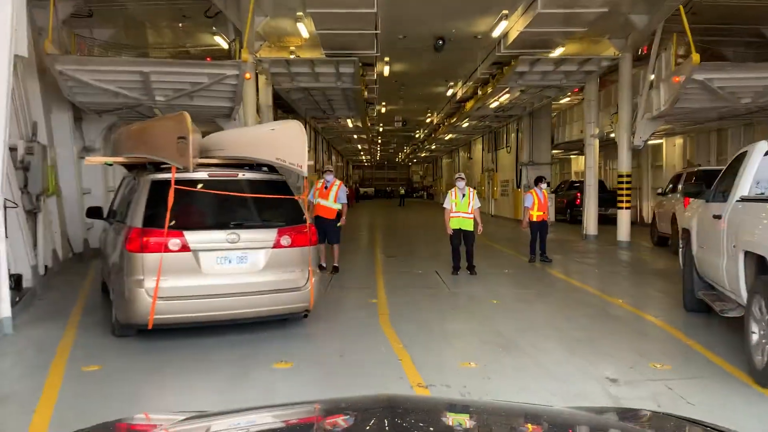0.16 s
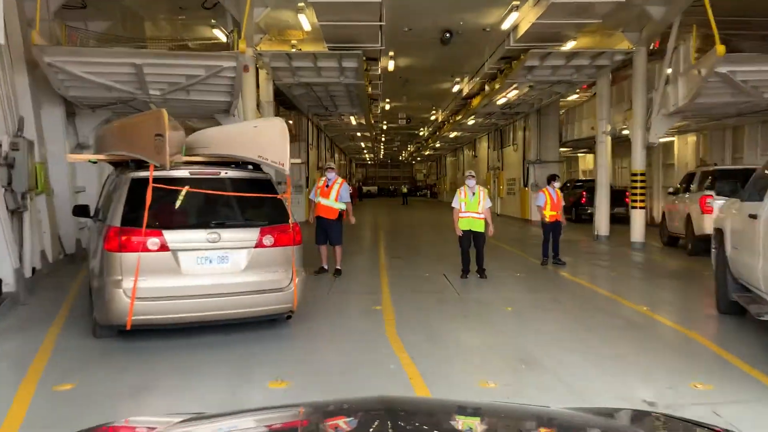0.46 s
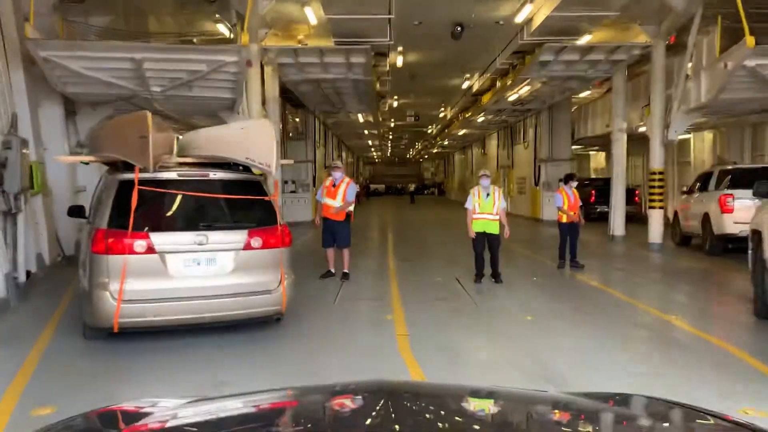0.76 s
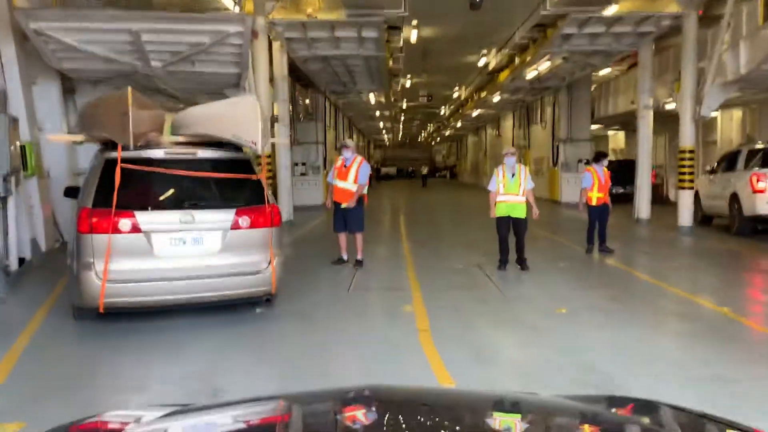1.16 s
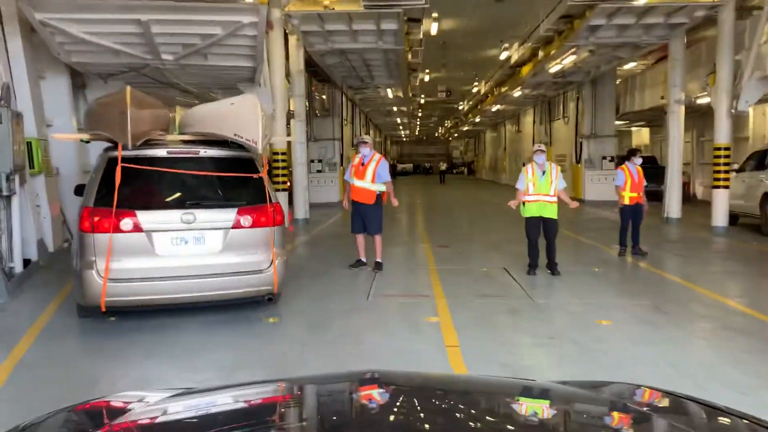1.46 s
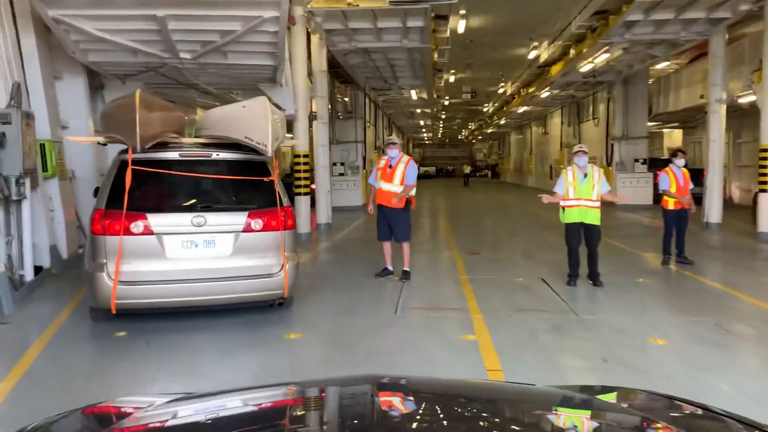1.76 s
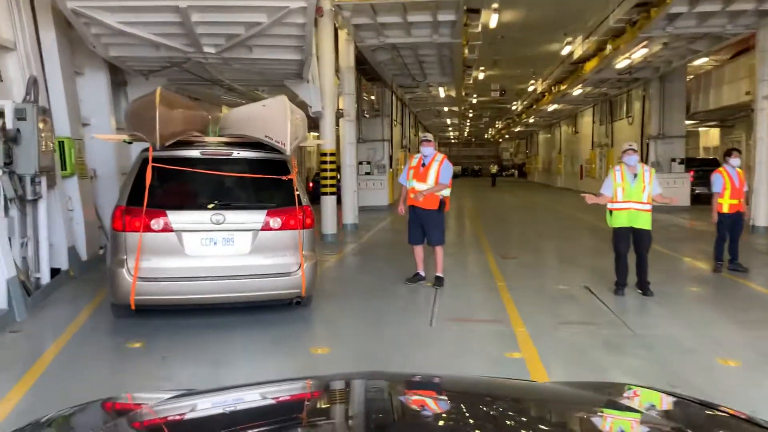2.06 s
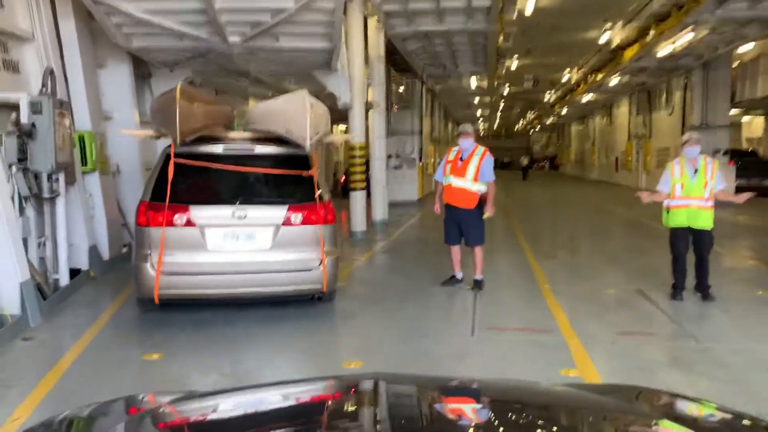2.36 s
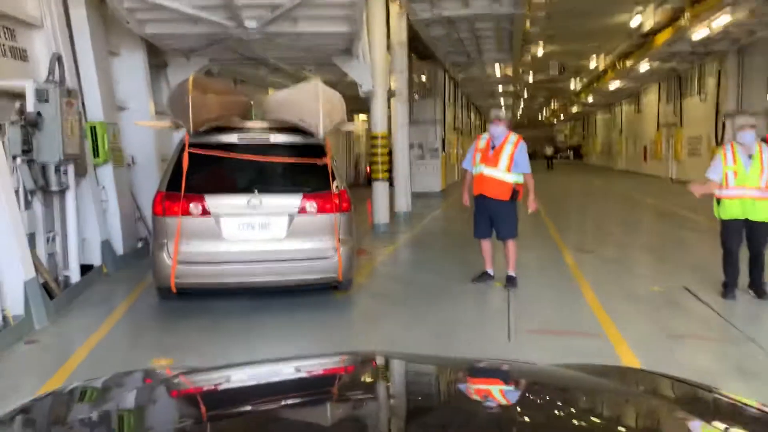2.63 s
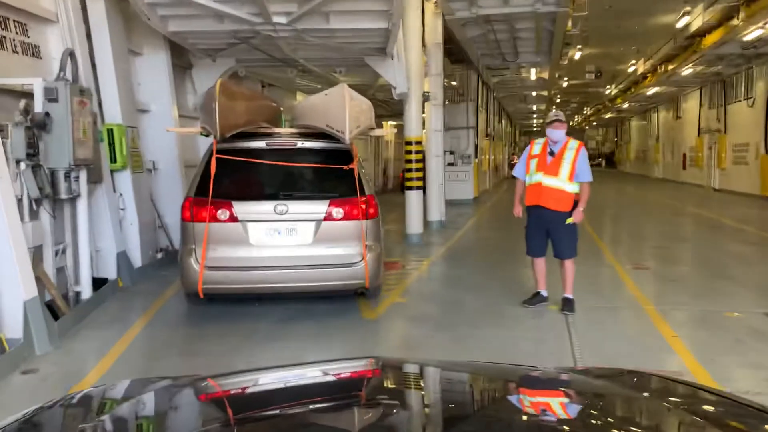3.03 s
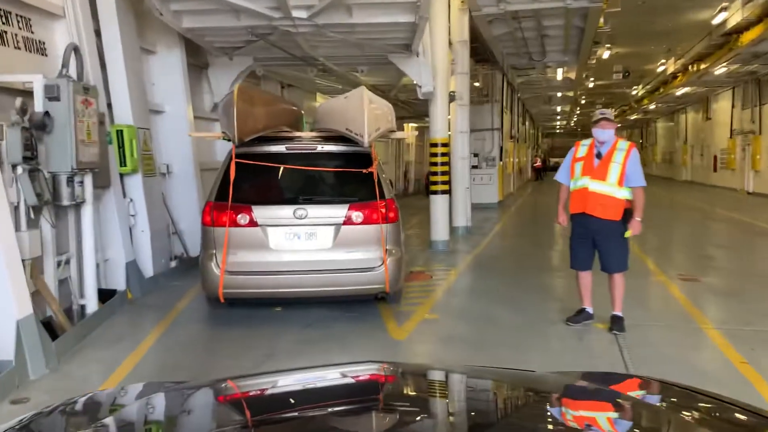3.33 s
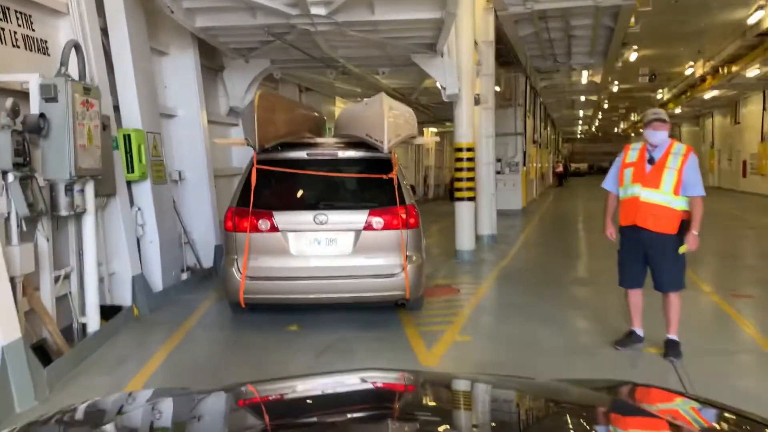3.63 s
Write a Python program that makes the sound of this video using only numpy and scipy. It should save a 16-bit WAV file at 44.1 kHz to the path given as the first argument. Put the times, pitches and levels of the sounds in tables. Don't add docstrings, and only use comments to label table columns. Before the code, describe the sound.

From a slowly rolling car, a phone picks up wavering fan hum, hull rumble and rushing air in a long steel hall, with brief plate thumps, one sharp air spit and three echoing puffs.

```python
import sys
import numpy as np
from scipy import signal
from scipy.fft import rfft, irfft, next_fast_len
from scipy.io import wavfile
from scipy.ndimage import uniform_filter1d, map_coordinates

SR = 44100
rng = np.random.default_rng(int(sys.argv[2]) if len(sys.argv) > 2 else 0)


def to_wav(s):
    ch = np.atleast_2d(s).T
    pcm = np.round(np.clip(ch, -1, 1) * 32767)
    wavfile.write(sys.argv[1], SR, pcm.astype(np.int16))


def ratio(d):
    e = np.asarray(d, float) / 20
    return 10 ** e


N = 167139
TIME = np.arange(N) / SR


def tone(hz, orders, level, apart):
    swell_db, apart_db = curve(level), curve(apart)
    usual_db = swell_db.mean()
    turn = 2 * np.pi * np.cumsum(hz + 0.45 * wobble(5)) / SR
    out = np.zeros((2, N))
    for multiple, db, share in orders:
        steady_db = usual_db + db
        mid_db = steady_db + share * (swell_db - usual_db) + 1.73 * wobble(5.67)
        mid = ratio(mid_db) * np.sin(multiple * turn + 0.68 * wobble(3.03))
        side_db = steady_db + np.minimum(apart_db + 4 * (multiple - 1), 2) + 0.5 * wobble(2.8)
        side = ratio(side_db) * np.cos(multiple * turn + wobble(2.72))
        out += np.sqrt(2) * np.array([mid + side, mid - side])
    return out


# (multiple of the blade tone, level over the blade tone [dB], share of its swell [0-1])
LOW_FAN_OVERTONES = [(1, 0.5, 0.88), (2, -38, 0.42), (3, -15, 0.27), (4, -35, 1), (5, -19, 0.8),
                     (6, -22, 0.57)]
HIGH_FAN_OVERTONES = [(1, 0.5, 1), (1.5, -8, 0.067)]
# (time [s], level [dB])
LOW_FAN_LEVEL = [(0.0, -27), (0.04, -20.5), (0.31, -16.5), (0.66, -17), (0.8, -19), (1.24, -26.5),
                 (1.41, -25.5), (1.77, -25), (1.9, -35), (2.16, -25.5), (2.51, -22.5), (2.62, -32),
                 (2.75, -29), (2.9, -34.5), (3.07, -21.5), (3.18, -29.5), (3.56, -22), (3.79, -25)]
HIGH_FAN_LEVEL = [(0.0, -23), (0.35, -17.5), (0.66, -28.5), (0.72, -16.5), (0.8, -27.5), (1.84, -22),
                  (1.92, -46), (2.16, -26.5), (2.51, -33), (2.59, -18), (2.73, -35), (2.83, -21.5),
                  (3.03, -40), (3.15, -20), (3.35, -19), (3.39, -29), (3.69, -18.5), (3.79, -29)]
# (time [s], level [dB])
TONE_662_LEVEL = [(0, -56), (.2, -33), (.33, -27.5), (.45, -39), (.6, -25), (.8, -34), (1.1, -36), (1.4, -41),
                  (1.75, -39), (1.95, -51), (2.4, -52), (2.73, -33.5), (2.95, -45), (3.07, -39), (3.3, -42),
                  (3.79, -48)]
# (time [s], level [dB])
LOW_FAN_SIDE = [(0, -23), (.5, -14), (.8, -24), (1.1, -5), (1.501, -17), (2.402, -15), (2.9, -10),
                (3.3, -18), (3.79, -14)]
HIGH_FAN_SIDE = [(0, -11), (1.5, -8), (2.5, -11.5), (3.79, -7)]
TONE_662_SIDE = [(0, -4), (3.79, -2)]
# (multiple, level over the tone [dB], share of its swell [0-1])
ALONE = [(1, 0, 1)]


def fans():
    low_fan = tone(164.44, LOW_FAN_OVERTONES, LOW_FAN_LEVEL, LOW_FAN_SIDE)
    high_fan = tone(254.2, HIGH_FAN_OVERTONES, HIGH_FAN_LEVEL, HIGH_FAN_SIDE)
    tone_662 = tone(662, ALONE, TONE_662_LEVEL, TONE_662_SIDE)
    return low_fan + high_fan + tone_662


# (time [s], firing rate [Hz], level [dB])
ENGINE = [(0.0, 63, -33), (0.18, 60, -56), (0.32, 65.3, -18), (0.5, 67.76, -52), (0.76, 60.7, -26.5),
          (0.99, 58.9, -26), (1.1, 69.2, -21.5), (1.26, 70, -20.5), (1.29, 69.2, -46), (1.95, 68.45, -21),
          (2.21, 64.8, -31), (2.4, 67.1, -43), (2.59, 66.1, -19.5), (2.79, 68.3, -29), (2.99, 58.6, -25),
          (3.43, 62.3, -31), (3.49, 67.5, -50), (3.79, 68.3, -28)]
# (time [s], level [dB])
IDLER_LEVEL = [(0.0, -31.5), (0.56, -23.5), (0.85, -34), (1.4, -24.5), (1.83, -37.5), (2.23, -27.5),
               (2.76, -41), (2.93, -50), (3.01, -27), (3.161, -54), (3.51, -34), (3.79, -36)]
# (time [s], level [dB])
PUMP_LEVEL = [(0.0, -33.5), (0.62, -24.5), (0.72, -39), (0.81, -28), (1.45, -25.5), (1.51, -37),
              (3.36, -33), (3.44, -42), (3.6, -24), (3.79, -36)]


def engines():
    low_side = [(0, -27)]
    time, rate_hz, db = np.transpose(ENGINE)
    engine = tone(curve(np.c_[time, rate_hz]), ALONE, np.c_[time, db], low_side)
    idler = tone(85.5, ALONE, IDLER_LEVEL, low_side)
    pump = tone(145.4, ALONE, PUMP_LEVEL, low_side)
    return engine + idler + pump


# (time [s], level [dB], note of the plate [Hz])
THUMPS = [
    (0.8, -22, 115),
    (0.43, -20, 88.5),
    (1.27, -12.5, 362),
    (1.361, -10, 112),
    (1.421, -13.5, 445),
    (2.52, -22, 385),
    (0.33, -21, 280),
    (3.191, -14.5, 385.6),
]


def thumps():
    rise_s, t60_s = 0.011, 0.33
    out = np.zeros(N)
    for start, db, note_hz in THUMPS:
        since = np.maximum(TIME - start, 0)
        swing = np.sin(2 * np.pi * note_hz * since)
        out += (1 - np.exp(-since / rise_s)) * ratio(db - 60 * since / t60_s) * swing
    return out


# (start [s], length [s], level [dB], whistle [Hz], whistle over the jet [dB])
PUFFS = [
    (1.251, 0.1, -20, 5770, -12),
    (2.224, 0.077, -32, 888, 4),
    (3.063, 0.16, -22, 8330, -16),
]
# (growl over the jet [dB], pipe note [Hz], brightness [dB per octave], first step of the opening [0-1])
GROWLS = [
    (3.5, 903, 0.2, 0.36),
    (6, 920, -4, 0.4),
    (-6.5, 925, -1.5, 0.7),
]
# (frequency [Hz], level [dB])
JET = [(120, 10), (400, -9.5), (800, -2), (1500, 0), (4000, -1), (6000, -12), (8000, -17), (13000, -24)]


def puffs():
    rise_s, fall_s, whistle_t60_s, growl_lag_s = 0.093, 0.4, 0.4, 0.021
    whistle_width_hz, pipe_width_hz = 420, 330
    out = np.zeros((2, N))
    for puff, growling in zip(PUFFS, GROWLS):
        start, length, db, whistle_hz, whistle_db = puff
        growl_db, pipe_hz, bright_db, step = growling
        since = np.maximum(TIME - start, 0)
        opening = np.clip(since / 0.01, 0, 1)
        fall = ratio(-60 * np.maximum(since - length, 0) / fall_s)
        swell = np.clip(step + (1 - step) * since / rise_s, 0, 1)

        def jet_gain(hz):
            return coloured(JET)(hz) * ratio(bright_db * np.log2(hz / 2000 + .1))

        def pipe_gain(hz):
            overtone = narrow(1.66 * pipe_hz, pipe_width_hz / 2)(hz)
            return narrow(pipe_hz, pipe_width_hz)(hz) + ratio(-2) * overtone

        jet = swell * fall * ratio(0.46 * wobble(39.93)) * rush(jet_gain, patchy_db=1.76)
        whistle = rush(narrow(whistle_hz, whistle_width_hz), patchy_db=0, standing_db=0)
        whistle *= ratio(whistle_db - 60 * since / whistle_t60_s)
        growl_swell = np.clip((since - growl_lag_s) / rise_s, 0, 1)
        growl = growl_swell * fall * ratio(growl_db) * rush(pipe_gain, patchy_db=0, standing_db=2)
        out += ratio(db) * opening * (jet + whistle + growl)
    return hall(out, wet_db=-3)


# (frequency [Hz], level [dB])
SPIT = [(1500, -24), (5000, -22), (8000, -17), (10000, -5), (11800, -14), (13500, 0), (15000, -8),
        (16000, -9)]


def spit():
    start, hold_s, t60_s = .9295, .005, 0.027
    echo_s, echo_db = 0.015, -12
    width = 0.77

    def burst(since):
        return (since > 0) * ratio(-60 * np.maximum(since - hold_s, 0) / t60_s)

    shape = burst(TIME - start) + ratio(echo_db) * burst(TIME - start - echo_s)
    dry_spit = ratio(-24.5) * shape * rush(coloured(SPIT), patchy_db=0, standing_db=0)
    wet = hall(dry_spit, wet_db=-4.5)
    return width * wet + (1 - width) * np.sqrt(2) * wet.mean(axis=0)


# (frequency [Hz], time to fall 60 dB [s])
HALL = [(500, 0.85), (3000, 0.62), (8000, 0.92), (14000, 0.4)]


def hall(x, wet_db):
    hz, t, z = signal.stft(rng.standard_normal((2, SR)), SR, nperseg=256)
    tail = signal.istft(z * ratio(-60 * t / along(HALL, hz)[:, None]), SR, nperseg=256)[1]
    tail = np.pad(tail, [(0, 0), (round(.012 * SR), 0)])
    wet = signal.fftconvolve(x, tail, axes=1)[:, :N]
    return x + ratio(wet_db) * wet * np.sqrt(np.sum(x ** 2) / np.sum(wet ** 2))


# (time [s], level [dB])
RUMBLE_LEVEL = [(0, -27.5), (.3, -25.5), (1.3, -25), (1.7, -27.5), (2.5, -26), (2.9, -27), (3.3, -25.5),
                (3.79, -29)]
ROAR_LEVEL = [(0.0, -22.5), (0.1, -23), (0.3, -22), (0.6, -23), (0.99, -21.5), (1.2, -21.5), (1.41, -19),
              (1.65, -23.5), (1.9, -25), (2.2, -22), (2.5, -23.5), (2.92, -23), (3.15, -21.5), (3.4, -21),
              (3.79, -23.5)]
# (frequency [Hz], level [dB])
HULL = [(8, -23), (30, -15.5), (52, -1.5), (66, -6.5), (100, -3.5), (125, -2.5), (200, -5.5), (300, -11)]
AIR = [(130, -0.5), (450, -3), (1000, -9.5), (1200, -14), (2500, -20), (4800, -30), (5600, -36.5),
       (9000, -41)]
HISS = [(4000, -2), (8000, -6), (10000, 7), (12000, 4), (13500, 8), (14300, -3), (15000, -6), (16000, -1)]


def background():
    hull = ratio(curve(RUMBLE_LEVEL) + 4 + .5 * wobble(6)) * rush(coloured(HULL), patchy_db=0, standing_db=0)
    air = ratio(curve(ROAR_LEVEL) + 3.0 + 0.67 * wobble(4.5)) * rush(coloured(AIR), patchy_db=.5)
    hiss = ratio(-49.5) * rush(coloured(HISS), patchy_db=1, standing_db=0)
    whine_gain = narrow(6573, width_hz=330)
    whine = ratio(-47.5 + 1.5 * wobble(30)) * rush(whine_gain, patchy_db=2, standing_db=0)
    return hull + air + hiss + whine


# (frequency [Hz], likeness [-1 to 1])
ALIKE = [(60, 1), (130, 0.94), (290, 1), (640, 0.33), (1410, -0.077), (3100, -0.042), (6810, 0.22),
         (15000, -0.64)]


def rush(gain, patchy_db, standing_db=2.5):
    pair = patched(rng.standard_normal((2, N)), patchy_db, size=512, tall=5, long=12)
    pair = patched(pair, standing_db, size=4096, tall=2, long=6)

    def share(hz):
        angle = np.arccos(np.clip(along(ALIKE, hz), -1, 1)) / 2
        return gain(hz) * [np.cos(angle), np.sin(angle)]

    mid, side = filtered(pair, share)
    return unit(np.array([mid + side, mid - side]))


def patched(x, depth_db, size, tall, long):
    if depth_db == 0:
        return x
    z = signal.stft(x, nperseg=size)[2]
    field = uniform_filter1d(rng.standard_normal(z.shape[1:]), size=tall, axis=0)
    field = uniform_filter1d(field, size=long, axis=1)
    return signal.istft(z * ratio(depth_db * unit(field)), nperseg=size)[1][:, :N]


def coloured(points):
    ends = [(points[0][0] / 2, -120)], [(points[-1][0] * 2, -120)]
    return lambda hz: ratio(along(ends[0] + list(points) + ends[1], hz))


def narrow(centre_hz, width_hz):
    return lambda hz: 1 / (1 + (2 * (hz - centre_hz) / width_hz) ** 2)


def filtered(x, response):
    m = next_fast_len(N + SR // 2)
    return irfft(rfft(x, m) * response(np.fft.rfftfreq(m, 1 / SR)), m)[..., :N]


def unit(x):
    return x / np.sqrt(np.mean(x ** 2) + 1e-20)


def along(points, hz):
    f, v = np.transpose(points)
    return np.interp(np.log(hz + 1), np.log(f + 1), v)


def curve(rows):
    return np.interp(TIME, *np.transpose(rows))


def wobble(rate):
    return map_coordinates(rng.standard_normal(200), [TIME * rate])


def scene():
    return fans() + engines() + thumps() + puffs() + spit() + background()


def low_pass(x):
    return signal.sosfilt(signal.butter(12, 15590, fs=SR, output="sos"), x)


# (frequency [Hz], gain [dB])
LEAN = [(60, -2), (240, 0.5), (950, 1.0), (3770, 1), (15000, -4.5)]
# (low [Hz], high [Hz],
# gain [dB])
SUM_GAPS = [(8400, 9000, -6), (11100, 12350, -60), (13800, 14450, -2), (14450, 16000, -16)]
DIFFERENCE_GAPS = [(6950, 7500, -2), (9700, 10450, -13), (10450, 10950, -9), (10950, 12600, -2),
                   (12600, 13200, -5.5), (13200, 14200, -13), (14200, 14600, -4.5), (14600, 15300, 5),
                   (15300, 15600, 3)]


def record(dry):
    ceiling, knee = .92, 6
    ports = filtered(dry, lambda hz: ratio(np.outer([.5, -.5], along(LEAN, hz))))
    left, right = ports / (1 + np.abs(ports / ceiling) ** knee) ** (1 / knee)

    def gaps(rows, hz):
        return ratio(sum(db * ((hz > low) & (hz < high)) for low, high, db in rows))

    mid_side = np.array([left + right, left - right]) / 2
    mid, side = filtered(mid_side, lambda hz: np.array([gaps(SUM_GAPS, hz), gaps(DIFFERENCE_GAPS, hz)]))
    return low_pass(np.array([mid + side, mid - side]))


dry = scene()
out = record(dry)
to_wav(out)
```